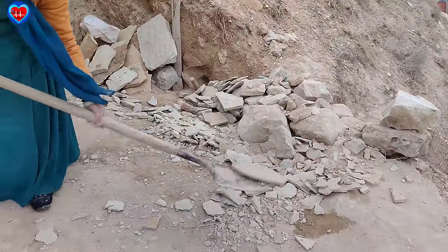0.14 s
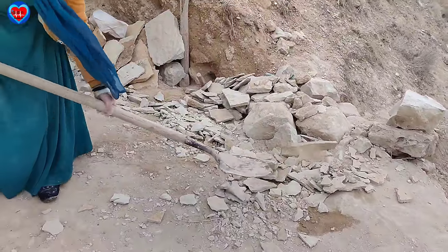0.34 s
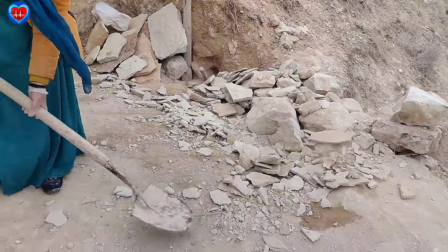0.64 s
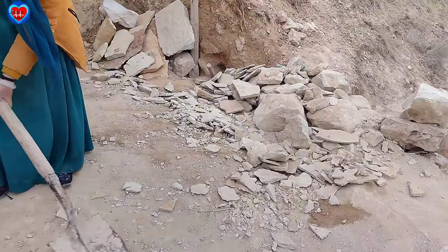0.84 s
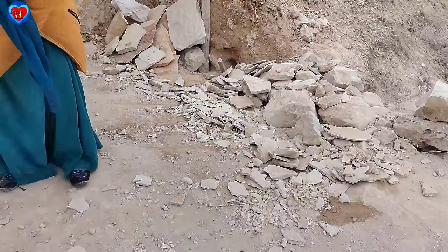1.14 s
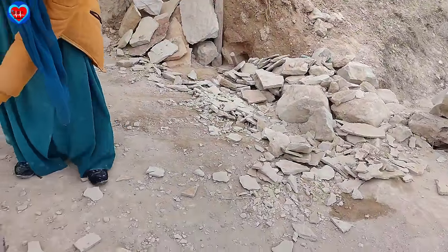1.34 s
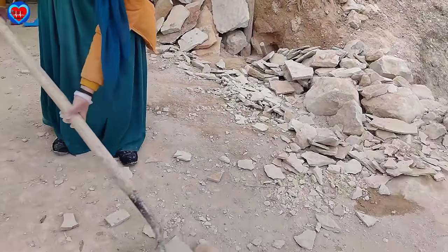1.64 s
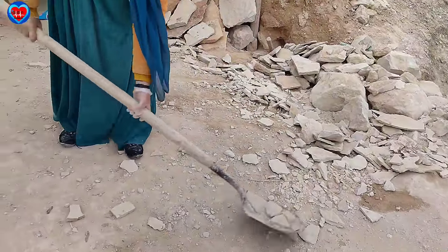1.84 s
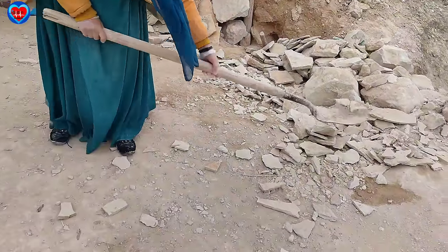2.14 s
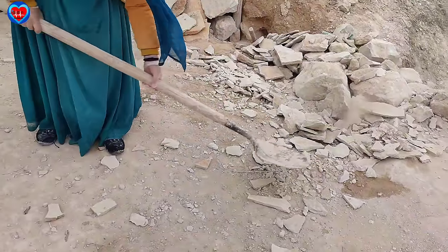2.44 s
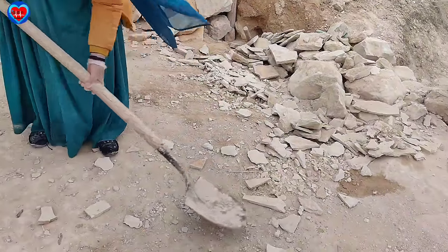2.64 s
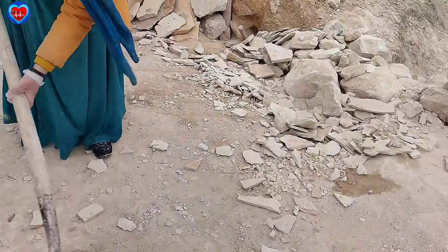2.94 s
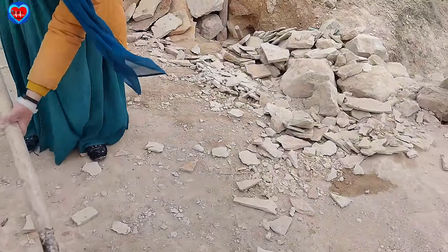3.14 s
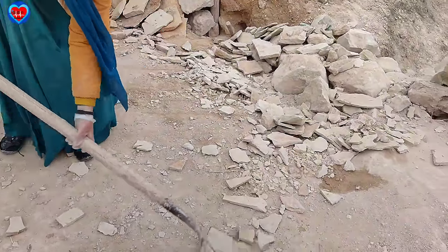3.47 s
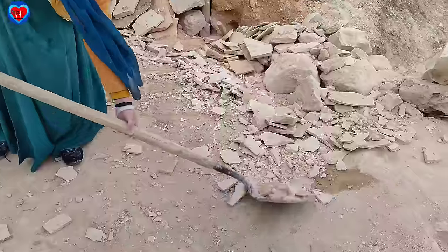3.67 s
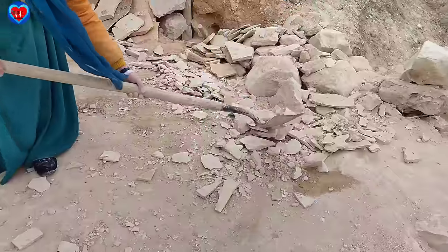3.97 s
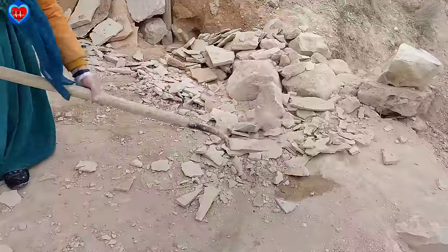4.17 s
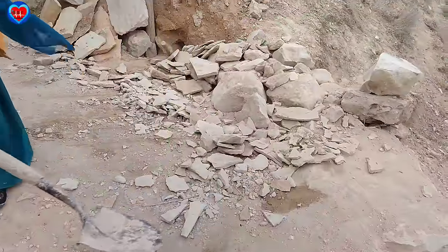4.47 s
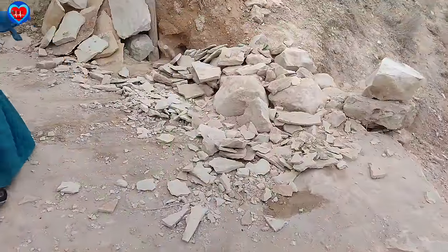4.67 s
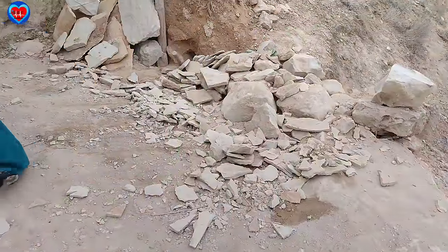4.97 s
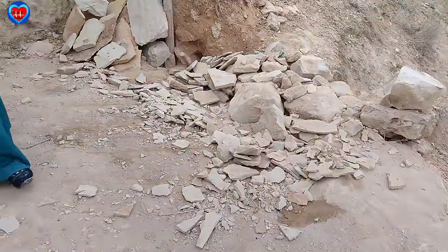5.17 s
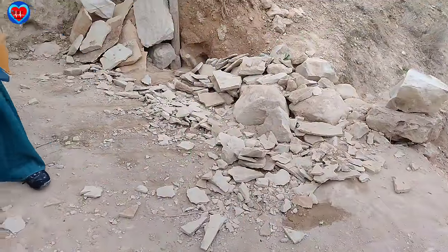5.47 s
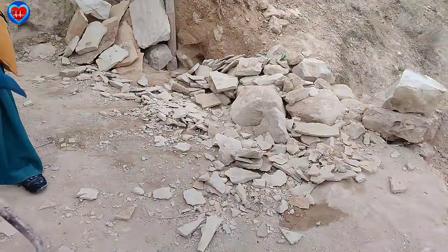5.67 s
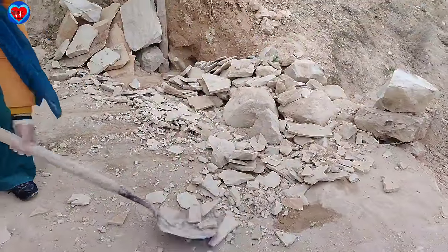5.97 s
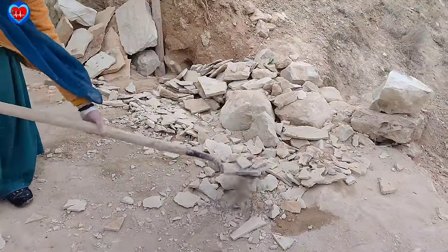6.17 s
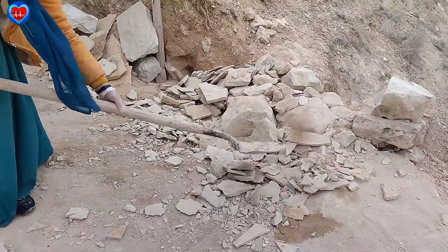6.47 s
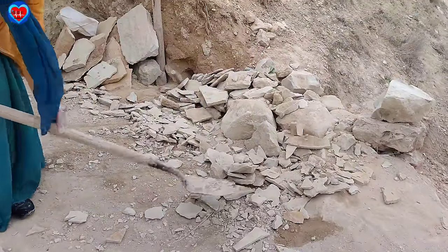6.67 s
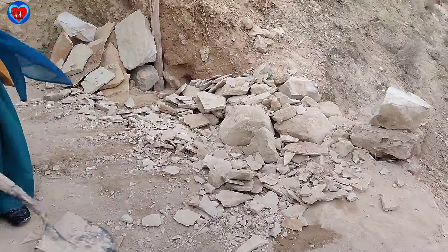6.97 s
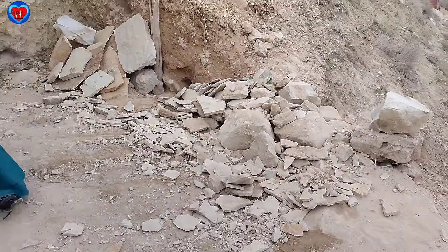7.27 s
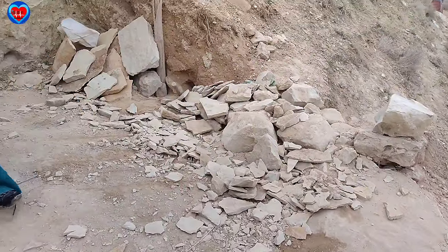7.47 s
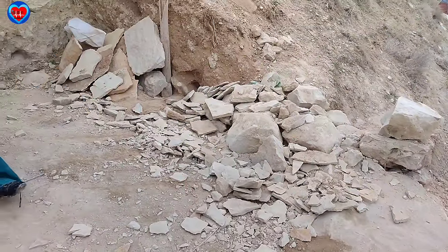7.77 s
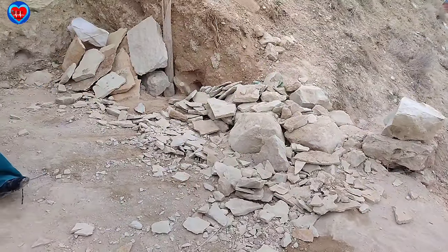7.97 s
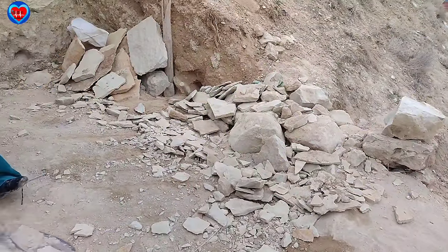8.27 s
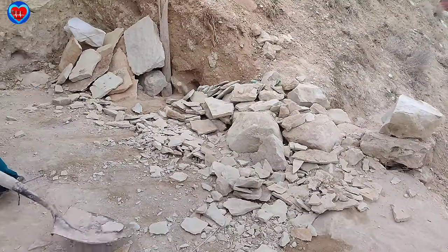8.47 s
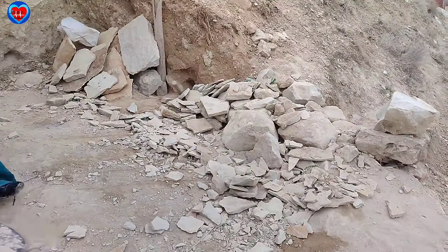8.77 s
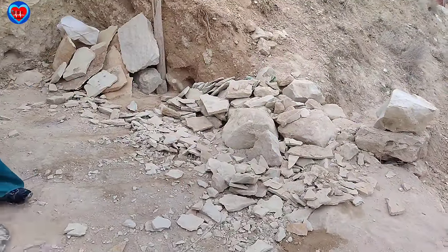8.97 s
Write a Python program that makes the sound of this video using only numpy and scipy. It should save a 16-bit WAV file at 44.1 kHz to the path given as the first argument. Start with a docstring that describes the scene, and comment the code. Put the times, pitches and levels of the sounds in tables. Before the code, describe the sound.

Shovel blade grating and ringing on gravel, then stone chips and slabs clinking down on a rock pile, with low wind rumble.

```python
"""A steel shovel scrapes over stony ground, scoops broken slate and tosses it on a heap, again and again.
Friction is modelled as dense random fractures of grit, which also set the blade's modes ringing.
Hits are noise bursts for the contact plus decaying modes of the blade, slabs, pebbles and chips.
Loose grit trickles as coloured grains and short ticks over faint hiss; rocks scatter sound in random tails.
Wind is low-passed turbulence at each of two microphone ports, strongest at the left one."""
import sys
import numpy as np
from scipy import signal
from scipy.fft import rfft, irfft, next_fast_len
from scipy.io import wavfile
from scipy.ndimage import map_coordinates

SR = 44100
rng = np.random.default_rng(int(sys.argv[2]) if len(sys.argv) > 2 else 0)


def inscribe(sig):
    """Save sig as 16-bit PCM at rate SR to the path in sys.argv[1].

    A 1-D sig is mono; a 2-D sig holds one channel per row.
    Samples are clipped to [-1, 1] before scaling.
    """
    pcm = np.round(np.clip(np.atleast_2d(sig).T, -1, 1) * 32767)
    wavfile.write(sys.argv[1], SR, pcm.astype(np.int16))


N = 401751  # samples in the scene
CLOCK = np.arange(N) / SR  # s, the whole scene
T = np.arange(SR // 2) / SR  # s, the longest single hit
TOP_HZ = 16000  # nothing sounds above this

# Strength of the wind on the ports. Each row: time in seconds, level in dB.
WIND_STRENGTH = [(0.0, -33.5), (0.05, -44), (0.12, -26), (1.22, -25.5), (1.37, -42), (1.6, -22.5),
                 (2.13, -47.5), (2.18, -38.5), (2.54, -42.5), (2.59, -31), (2.69, -49.5), (3.22, -37.5),
                 (3.3, -24), (3.37, -39.5), (3.45, -22.5), (5.3, -39), (5.91, -28.5), (5.94, -31),
                 (7.51, -37), (7.86, -27.5), (8.02, -32), (8.27, -19.5), (8.73, -31), (9.11, -21.5)]
# Short gusts hitting the ports. Each row: start in seconds, length in seconds, rumble in dB, flutter in dB.
GUSTS = [(0.134, 0.03, -29, -27), (0.833, 0.12, -22.5, -32.5), (1.146, 0.062, -25, -29.5),
         (2.563, 0.063, -39, -40.5), (3.284, 0.036, -27.5, -42), (4.315, 0.038, -27, -43),
         (4.78, 0.17, -33.5, -44.5), (5.316, 0.08, -36.5, -37.5), (5.837, 0.079, -28, -33.5),
         (7.699, 0.18, -29, -39)]
# Single eddies popping on the left port. Each row: time in seconds, relative peak in dB.
EDDY_POPS = [(0.162, -13.5), (0.474, -17), (0.856, -11), (0.959, -18), (1.139, -21.5), (1.194, -3.5),
             (2.584, -22)]
# Spectrum of slow turbulence. Each row: frequency in Hz, level in dB.
RUMBLE_SPECTRUM = [(10, -6), (25, 5), (45, 4), (80, -0.5), (130, -8), (200, -21), (400, -77.5)]
# Spectrum of fast turbulence. Each row: frequency in Hz, level in dB.
FLUTTER_SPECTRUM = [(60, -13.5), (140, 6.5), (220, 1), (330, -19), (500, -35), (1000, -46), (3000, -58.5)]
# Spectrum of the faint open air. Each row: frequency in Hz, level in dB.
AIR_SPECTRUM = [(30, -6), (200, -7.5), (500, -18.5), (1200, -28), (5000, -33.5), (9000, -38), (16000, -30)]
# Loose grit spilling and sliding. Each row: start in seconds, length in seconds, level in dB.
SPILLS = [(1.28, 0.071, -52), (2.54, 0.2, -45.5), (2.96, 0.09, -49), (3.92, 0.51, -44), (6.2, 0.19, -43.5),
          (6.8, 0.16, -51.5)]
# Spectrum of sliding dust. Each row: frequency in Hz, level in dB.
DUST_SPECTRUM = [(150, 0.5), (400, 2), (1000, -1), (2500, 1), (5000, -3), (7000, -7), (9000, -22),
                 (12500, -10.5), (16000, -16.5)]
# Small stones clinking. Each row: time in seconds, level in dB, knock in dB, ring in dB, lowest mode in Hz.
CHIPS = [(0.012, -44, -15.5, 10.5, 3600), (0.112, -44.5, -15, 9.5, 3630), (0.5194, -20.5, -23, -16, 1700),
         (0.5735, -23.5, -15, 14, 3450), (0.5849, -22.5, -3, 8, 1700), (0.6599, -32, -12, -3, 5470),
         (0.7015, -24, -20, 1.5, 5880), (1.8712, -15.5, -1.5, 12.5, 3370), (1.8834, -16.5, -14, 9.5, 3530),
         (1.933, -22, -12.5, 8.5, 3540), (1.9474, -25, -29, 11.5, 3620), (2.4351, -27.5, 9, -15, 1580),
         (2.4568, -19, -18, 0.5, 2410), (2.4704, -21.5, -7, 1, 3350), (2.4824, -16.5, -22, 0.5, 3760),
         (2.4995, -14.5, -2, 6.5, 2400), (2.5294, -18.5, -11, 1, 2390), (2.6005, -29.5, -11, 5.5, 6660),
         (2.6135, -23, -8, -8, 6700), (3.9, -22, -9, -5, 2240), (4.0214, -17.5, -11.5, 4, 2170),
         (4.0355, -15, -28, 4.5, 1750), (4.1064, -24, -22, -9, 1810), (4.1597, -23.5, -3.5, -14, 1780),
         (4.1949, -17.5, -10, -11.5, 2240), (4.2617, -8, -15.5, -22, 4100),
         (4.2757, -14.5, -36.5, -13, 3830), (4.2886, -11, -24, -4.5, 5640), (4.2944, -10.5, -23, -15, 2680),
         (4.3665, -20.5, -2, -1.5, 3020), (4.4538, -35.5, 2.5, 2.5, 2180), (6.3095, -21, -37, -22, 4350),
         (6.4747, -19.5, -32, -2.5, 3720), (6.528, -31, -36.5, 4.5, 5430), (6.5823, -28.5, -13.5, -3, 5450),
         (6.6423, -13.5, -9.5, -3.5, 1615), (6.6756, -23, -25, 8, 2430), (7.028, -32, -6, -8, 1440),
         (7.0436, -27, -1.5, -1, 1685), (8.7531, -23.5, -20, -6, 4980)]
# Slabs landing and bouncing, and two faint low pebble knocks (near 4.4 and 4.5 s). Each row: time in seconds,
# level in dB, knock in dB, ring in dB, lowest mode in Hz.
SLABS_AND_PEBBLES = [(0.5288, -5.5, -5, -4, 940), (0.5728, -16.5, 6, 13, 941), (0.7004, -17, -8, 10, 930),
                     (0.7121, -27.5, 4, 11, 930), (0.7672, -30.5, -14, 10, 883), (0.7822, -28, 10, 10, 943),
                     (4.4253, -43.5, 8, 9.5, 790), (4.511, -41.5, 6, 2, 820),
                     (6.4366, -13.5, -11, -8.5, 926), (6.457, -24, -9, 0.5, 990),
                     (6.6822, -12, -10, -5.5, 955.5)]
# Modes of a stone plate. Each row: multiple of its lowest mode, level in dB, t60 in seconds before scaling.
STONE_MODES = [(0.999, 7, 0.099), (1.075, -9, .07), (1.6, -20, .04), (1.93, -1.5, 0.11), (2.55, -19, 0.13),
               (3.3, -20.5, .05), (3.631, -12.5, 0.07), (5.68, -24.5, 0.055), (6.15, -20, .07)]
# Strokes of the blade over the ground. Each row: start, hardest push and end in seconds,
# rasp in dB, digging in dB.
STROKES = [(0.169, 0.219, 0.26, -27.5, -29.5), (1.367, 1.387, 1.494, -29, -42.5),
           (1.455, 1.623, 1.955, -22.5, -26.5), (2.008, 2.193, 2.23, -39, -44),
           (3.283, 3.58, 3.86, -24, -29.5), (3.94, 3.98, 4.34, -38.5, -42),
           (5.149, 5.194, 5.26, -28.5, -42.5), (5.331, 5.398, 5.71, -24, -36),
           (5.719, 5.945, 6.15, -25, -34.5), (7.469, 7.502, 7.535, -33, -46),
           (7.862, 7.986, 8.15, -41.5, -49), (8.147, 8.181, 8.6, -35.5, -41)]
# The blade catching on embedded stones and tearing free. Each row: time in seconds, rasp in dB, digging in dB.
CATCHES = [(1.476, -17, -26), (1.587, -17.5, -42), (1.65, -20.5, -23.5), (1.716, -23, -22.5),
           (3.284, -19, -29), (3.452, -16, -23), (3.578, -30, -27.5), (3.635, -20, -27),
           (3.683, -18.5, -20), (3.754, -28, -31.5), (5.275, -28, -44), (5.368, -25, -42), (5.5, -31, -41),
           (5.641, -23.5, -56), (5.956, -17.5, -22), (6.062, -27, -28), (6.13, -30, -30.5),
           (8.21, -33, -60), (8.534, -36.5, -53.5), (8.6, -53, -37.5)]
# Spectrum of the rasp. Each row: frequency in Hz, level in dB.
RASP_SPECTRUM = [(300, -22), (900, -20.5), (1600, -8), (2400, 0.5), (3800, -2), (5200, -6), (7000, -11),
                 (9000, -20.5), (12500, -14.5), (16000, -23.5)]
# Spectrum of the digging. Each row: frequency in Hz, level in dB.
DIG_SPECTRUM = [(100, -4.5), (250, -2), (450, -6), (750, 2), (1350, 1), (2000, -1), (4000, -37)]
# The blade striking stones or ringing as it lifts off the ground. Each row: time in seconds, level in dB,
# knock in dB, ring in dB, favoured pitch in Hz.
BLOWS_AND_LIFTS = [(0.188, -13.5, -11, -0.5, 1930), (0.2748, -20, -7, 2.5, 2290),
                   (1.4645, -4.5, -19.5, -4.5, 2110), (1.6463, -7, 0.5, 3.5, 1590),
                   (2.1545, -23.5, -5, -0.5, 2270), (2.2134, -23.5, -23, -1, 1600),
                   (3.2734, -11.5, -12, -13.5, 2890), (3.3301, -4.5, -2.5, -2, 2300),
                   (3.5219, -4, -9.5, -5, 2800), (3.5683, -4.5, -5.5, -4.5, 2490),
                   (3.6394, -17.5, 4.5, 7, 2630), (3.6764, -21.5, -10.5, 14.5, 2290),
                   (3.691, -20, -4, 0, 2240), (3.9898, -18.5, -6, 4.5, 2470),
                   (4.0613, -15, -23.5, -4.5, 1830), (5.1436, -30.5, -34, 2.5, 2300),
                   (5.2175, -17.5, -16, -8.5, 2290), (5.7513, -9.5, -23.5, -7, 3530),
                   (5.8217, -6.5, -42.5, -8.5, 4100), (5.9464, -1, -25, -16, 3610),
                   (5.9802, -11.5, -1, -24.5, 1860), (6.2681, -17, -44.5, -14.5, 3250),
                   (7.3955, -18.5, -4, -2, 2470), (7.413, -26.5, -13.5, 0.5, 1880),
                   (7.5276, -29.5, -18, -1, 2300), (8.3858, -18, -0.5, 7, 2900), (8.6001, -34, -6, 9, 1575),
                   (8.738, -18.5, -8, -14, 2520), (8.9364, -20, -27, -0.5, 2110),
                   (8.9434, -11.5, -10, -2, 2120)]
# Modes of the free steel blade. Each row: frequency in Hz, level in dB, t60 in seconds.
BLADE_MODES = [(638.4, -21.5, 0.65), (996, -21, 0.23), (1336, -10.5, 0.067), (1574, -16, 0.45),
               (1670, -22.5, 0.37), (1844, -6, 0.25), (1937, -13, 0.5), (2050, -3.5, 0.11),
               (2125, -13, 0.2), (2184, -12, 0.32), (2277, 0.5, .11), (2452, -7, .09), (2550, -8.5, 0.13),
               (2890, -9, 0.11), (3430, -13.5, 0.16), (3590, -3.5, 0.12), (3660, -10.5, 0.12),
               (4050, -16, .11), (4160, -19.5, 0.11), (4770, -18, 0.12), (5300, -15, 0.075),
               (6720, -17.5, 0.089)]
# Where the blade is. Each row: time in seconds, lead of the left port in ms, left-right difference in dB.
BEARING = [(.2, 0.14, -0.5), (1.6, 0.17, 1.5), (2.3, 0.37, 5), (3.3, 0.16, -1), (3.7, 0.024, 2.5),
           (4.2, 0.53, 1.5), (5.4, .38, -3), (6, 0.11, 4.5), (7.4, 0.38, -4.5), (9, 0.44, -3)]
# Sound arriving scattered off ground and rocks. Each row: frequency in Hz, share of the power.
SCATTERED_SHARE = [(500, 0.072), (1000, 0.41), (2300, 0.64), (5000, 0.85), (12000, 0.81)]
# Difference in colour of the two ports. Each row: frequency in Hz, left-right difference in dB.
PORT_COLOUR = [(400, -3.5), (1000, 4), (1600, 0.5), (2300, -5), (3100, -4.5), (4500, -10.5), (6200, -9),
               (7500, 3.5), (8600, 5.5), (10000, -5), (13000, -5.5)]

GUST_ATTACK_S, GUST_RELEASE_S = 0.019, 0.018
FLUTTER_DB, FLUTTER_GROWS = -47, 1.2  # flutter at the mean strength; it grows faster than the rumble
SPILL_ATTACK_S, SPILL_SETTLE_S = 0.07, 0.12
HISS_DB = -59.5  # a faint steady bed of fine hiss under the spills
GLANCE = 0.32  # dB of crispness gained for each dB of knock lost, as an edge glances off
ENTRY_DB, EXIT_DB = -9.5, -12  # pressure as a stroke begins and ends, against its hardest push
DIG_GROWS = 1.25  # the low grinding grows faster with pressure than the rasp
SINGING_GROWS, FIRM_DB = 0.82, -24  # the steel sings more freely when pressed less than firmly
STROKE_ATTACK_S, STROKE_RELEASE_S = 0.0072, 0.014
CATCH_ATTACK_S, CATCH_HOLD_S, CATCH_RELEASE_S = 0.0075, 0.0088, 0.016
JUDDER_DB, JUDDER_RATE = 1.25, 90  # uneven running of the blade: dB, random knots a second


def amp(db):
    """Level: decibels to amplitude gain."""
    return np.exp(np.asarray(db) * (np.log(10) / 20))


def unit(x):
    """Normalization: scale to rms 1."""
    return x / np.sqrt(np.mean(x ** 2) + 1e-20)


def struck(x):
    """Normalization of a hit: its first 5 ms get rms 1."""
    return x / np.sqrt(np.mean(x[:SR // 200] ** 2) + 1e-20)


def along(points, hz):
    """Interpolation of (Hz, value) points on a logarithmic frequency axis."""
    f, v = np.transpose(points)
    return np.interp(np.log(hz + 1), np.log(f + 1), v)


def curves(rows):
    """Linear interpolation in time: one value per sample for each column after the time."""
    s, *cols = np.transpose(rows)
    return [np.interp(CLOCK, s, c) for c in cols]


def wobble(rate):
    """Slow random fluctuation: a spline through normal draws, rate knots a second."""
    knots = rng.standard_normal(int(N * rate / SR) + 4)
    return map_coordinates(knots, [np.arange(N) * rate / SR])


def filtered(x, response):
    """Linear filtering: the spectrum of x times a response of frequency."""
    m = next_fast_len(N + SR // 4)
    return irfft(rfft(x, m) * response(np.fft.rfftfreq(m, 1 / SR)), m)[..., :N]


def coloured(x, spectrum, size=4096):
    """Minimum-phase filtering: folding the cepstrum makes the filter causal; the result has rms 1."""
    log_gain = np.log(amp(along(spectrum, np.fft.rfftfreq(size, 1 / SR))))
    cepstrum = irfft(log_gain)
    cepstrum[1:size // 2] *= 2
    cepstrum[size // 2 + 1:] = 0
    impulse_response = irfft(np.exp(rfft(cepstrum)))
    return unit(signal.oaconvolve(x, impulse_response)[:N])


def add(track, s, x):
    """Superposition: mix x into the track at time s."""
    part = track[max(0, round(s * SR)):][:len(x)]
    part += x[:len(part)]


def envelope(start, length, attack_s, release_s):
    """Exponential growth to 1 at the start, a hold for the length, then exponential decay."""
    before = np.maximum(start - CLOCK, 0)
    after = np.maximum(CLOCK - start - length, 0)
    return np.exp(-before / attack_s - after / release_s)


def joined(gains):
    """Incoherent addition: independent sounds add in power."""
    return np.sqrt(sum(gain ** 2 for gain in gains))


def gusting():
    """Wind load: the gains of rumble and flutter follow the wind's strength and leap in a gust."""
    strength_db, = curves(WIND_STRENGTH)
    rumble = [amp(strength_db)]
    flutter = [amp(FLUTTER_DB + FLUTTER_GROWS * (strength_db - strength_db.mean()))]
    for start, length, rumble_db, flutter_db in GUSTS:
        gust = envelope(start, length, GUST_ATTACK_S, GUST_RELEASE_S)
        rumble.append(amp(rumble_db) * gust)
        flutter.append(amp(flutter_db) * gust)
    return joined(rumble), joined(flutter)


def wind():
    """Turbulence: independent pressure noise at each port, strongest at the windward left; eddies pop there."""
    rumbling, fluttering = gusting()
    ports = []
    for slow_db, fast_db in [(6.5, 8.0), (-8.5, -10)]:  # left, right
        swirl = unit(amp(3.23 * wobble(22)) * coloured(rng.standard_normal(N), RUMBLE_SPECTRUM))
        # the fast flutter comes in bursts, where the slow swirl swings furthest
        flutter = unit(np.abs(swirl) ** 1.35 * coloured(rng.standard_normal(N), FLUTTER_SPECTRUM))
        ports.append(rumbling * amp(slow_db) * swirl + fluttering * amp(fast_db) * flutter)
    u = (T[:SR // 40] - .01) / .0012  # time from the pop's peak, in units of 1.2 ms
    pop = (1 + u ** 2) ** -1.5
    for s, db in EDDY_POPS:
        add(ports[0], s - .01, amp(db + 9) * pop)
    return np.array(ports)


def open_air():
    """Diffuse background: faint steady coloured noise, independent at each port."""
    return amp(-60.0) * np.array([coloured(rng.standard_normal(N), AIR_SPECTRUM) for port in range(2)])


def grains(rate, spread_db, clump_db):
    """Granular noise: tiny fractures at random moments, few large and many small, coming in clumps."""
    sizes = amp(spread_db * np.minimum(rng.exponential(size=N), 4)) * rng.choice([-1, 1], N)
    breaks = rng.random(N) < rate / SR
    return unit(breaks * sizes * amp(clump_db * wobble(170)))


def pebbles(rate, hz, cycles, spread_db, size=500):
    """Small-body resonance: bits of gravel tick together, each a brief damped sine at its own pitch."""
    draws = rng.random((int(rate * N / SR), 4))
    when, pitch, force, life = draws.T[:, :, None]
    turns = np.minimum(hz * 2 ** (2.4 * (pitch - .5)), TOP_HZ) * T[:size]
    strength = amp(spread_db * np.minimum(-np.log(1 - force), 3.5))
    ticks = strength * np.sin(2 * np.pi * turns) * np.exp(-turns / (cycles * (.5 + life)))
    places = (when * N).astype(int) + np.arange(size)
    return unit(np.bincount(places.ravel(), ticks.ravel(), N)[:N])


def trickling():
    """Granular flow: dust and fine gravel slide off the blade and down the heap, over a faint bed of hiss."""
    spills = [amp(db) * envelope(start, length, SPILL_ATTACK_S, SPILL_SETTLE_S)
              for start, length, db in SPILLS]
    flow = joined([amp(HISS_DB), *spills])
    dust = coloured(grains(rate=7600, spread_db=0.0, clump_db=2.0), DUST_SPECTRUM)
    gravel = pebbles(rate=390, hz=3070, cycles=6.9, spread_db=4.5)
    return flow * (amp(-2.5) * dust + amp(-16.0) * gravel)


def ring(modes, scatter_db, size):
    """Modal synthesis: a sum of decaying sines, excited at new strengths at every contact point."""
    hz, db, t60 = np.transpose(modes)[:, :, None]
    level = db + scatter_db * rng.standard_normal(hz.shape)
    sign = rng.choice([-1, 1], hz.shape) * (hz < TOP_HZ)
    decay = amp(level - 60 * T[:size] / t60)
    return struck(np.sum(sign * decay * np.sin(2 * np.pi * hz * T[:size]), axis=0))


def clinks(rows, life, dull_db):
    """Plate vibration: struck stones ring; life scales t60, dull_db is the higher modes' fall per octave."""
    out = np.zeros(N)
    for s, db, knock_db, ring_db, hz in rows:
        modes = [(hz * k, level - dull_db * np.log2(k), t60 * life) for k, level, t60 in STONE_MODES]
        add(out, s, amp(db + ring_db - 13.0) * ring(modes, scatter_db=6.0, size=SR // 5))
    return out


def crunch(knock_db, crisp_db, t60, size=5000):
    """Brittle fracture: a sharp crack and slower crumbling, as decaying noise in three bands."""
    crumbling = amp(-60 * T[:size] / t60)
    crack = amp(9 - 60 * T[:size] / 0.017)
    out = 0
    for lo, hi, db in [(556, 1770, knock_db), (1580, 4980, -1.7), (5700, 16300, crisp_db + 9.0)]:
        band = signal.butter(2, [lo, hi], "band", fs=SR)
        noise = (crumbling + crack) * rng.standard_normal(size)
        out = out + amp(db) * struck(signal.lfilter(*band, noise))
    return out


def crunches(rows, t60, crisp_db, glance):
    """Contact noise of every row in a table; a glancing contact has less knock and more crispness."""
    out = np.zeros(N)
    for s, db, knock_db, *ringing in rows:
        add(out, s, amp(db - 10.0) * crunch(knock_db, crisp_db - glance * knock_db, t60))
    return out


def effort():
    """Friction force: gains of rasp and digging; strokes press harder, then ease; each catch adds a surge."""
    judder_db = JUDDER_DB * wobble(JUDDER_RATE)
    rasp, dig = [], []
    for start, hardest, end, rasp_db, dig_db in STROKES:
        contact = envelope(start, end - start, STROKE_ATTACK_S, STROKE_RELEASE_S)
        push_db = np.interp(CLOCK, [start, hardest, end], [ENTRY_DB, 0, EXIT_DB])
        pressure_db = push_db + judder_db
        rasp.append(contact * amp(rasp_db + pressure_db))
        dig.append(contact * amp(dig_db + DIG_GROWS * pressure_db))
    for s, rasp_db, dig_db in CATCHES:
        surge = envelope(s, CATCH_HOLD_S, CATCH_ATTACK_S, CATCH_RELEASE_S)
        rasp.append(amp(rasp_db) * surge)
        dig.append(amp(dig_db) * surge)
    return joined(rasp), joined(dig)


def scraping():
    """Friction excitation: grit breaks under the blade and rings the steel; digging adds a coarse, low grinding."""
    rasping, digging = effort()
    fine = grains(rate=5500, spread_db=3.5, clump_db=2.0)
    coarse = grains(rate=880, spread_db=5.5, clump_db=4.5)
    snaps = grains(rate=180, spread_db=9.0, clump_db=0.0)
    rasp = rasping * amp(-3.0) * coloured(fine + .5 * coarse + 0.41 * snaps, RASP_SPECTRUM)
    gravel = rasping * amp(-11.5) * pebbles(rate=800, hz=3263, cycles=7.0, spread_db=1.0)
    dig = digging * amp(-1.5) * coloured(grains(rate=1800, spread_db=4.5, clump_db=3), DIG_SPECTRUM)
    # pressed against the ground, the plate is partly damped
    damped = [(hz, db, .6 * t60) for hz, db, t60 in BLADE_MODES]
    steel = ring(damped, scatter_db=0, size=SR // 2)
    drive = amp(FIRM_DB - 6) * (rasping / amp(FIRM_DB)) ** SINGING_GROWS * fine
    singing = signal.oaconvolve(drive, steel / np.linalg.norm(steel))[:N]
    return rasp + gravel + dig + singing


def clangs(favour_db, octaves):
    """Modal excitation: the blade, struck or lifting off, rings with the modes around one pitch favoured."""
    out = np.zeros(N)
    for s, db, knock_db, ring_db, favoured_hz in BLOWS_AND_LIFTS:
        modes = []
        for hz, level, t60 in BLADE_MODES:
            closeness = np.exp(-(np.log2(hz / favoured_hz) / octaves) ** 2)
            modes.append((hz, level + favour_db * closeness, t60))
        add(out, s, amp(db + ring_db - 10.5) * ring(modes, scatter_db=4.0, size=SR // 2))
    return out


def placed(x, lead_ms, pan_db):
    """Time and level differences: the left port hears the source a little earlier, and the levels differ."""
    shift = lead_ms * SR / 1000  # samples
    late = map_coordinates(x, [np.arange(N) - shift], order=3)
    return np.array([amp(pan_db / 2) * x, amp(-pan_db / 2) * late])


def rocks(x, t60, size):
    """Diffuse scattering: convolution with decaying noise for each port, new for every stretch of size samples."""
    pieces = np.pad(x, (0, -N % size)).reshape(-1, size)
    tails = rng.standard_normal((2, *pieces.shape)) * amp(-60 * T[:size] / t60)
    tails /= np.linalg.norm(tails, axis=2, keepdims=True)
    answers = irfft(rfft(pieces, 2 * size) * rfft(tails, 2 * size))
    # each answer overhangs into the next stretch
    heads = answers[..., :size].reshape(2, -1)
    overhangs = answers[..., size:].reshape(2, -1)
    return (heads + np.pad(overhangs, ((0, 0), (size, 0)))[:, :-size])[:, :N]


def scene():
    """Superposition: shovel and heap among the rocks, in wind and faint open air."""
    bearing = curves(BEARING)
    shovel = scraping() + crunches(BLOWS_AND_LIFTS, t60=0.062, crisp_db=-26, glance=GLANCE)
    large_contacts = crunches(SLABS_AND_PEBBLES, t60=0.11, crisp_db=-26, glance=GLANCE)
    chip_contacts = crunches(CHIPS, t60=0.096, crisp_db=-27, glance=0.05)
    stones = large_contacts + chip_contacts + trickling()

    direct = placed(shovel, *bearing) + stones
    near_rocks = rocks(shovel + stones, t60=0.02, size=1024)
    scattered = near_rocks + amp(-16.0) * rocks(shovel + stones, t60=.25, size=8192)
    share = lambda hz: np.clip(along(SCATTERED_SHARE, hz), 0, 1)
    grit = filtered(direct, lambda hz: np.sqrt(1 - share(hz)))
    grit = grit + filtered(scattered, lambda hz: np.sqrt(share(hz)))

    steel = placed(clangs(favour_db=9, octaves=0.064), *bearing)
    # a negative dull_db strengthens the higher modes
    plates = clinks(SLABS_AND_PEBBLES, life=0.94, dull_db=-3.0) + clinks(CHIPS, life=0.61, dull_db=24.5)
    work = filtered(grit + steel + plates,
                    lambda hz: amp(np.outer([1, -1], along(PORT_COLOUR, hz)) / 2))
    return work + open_air() + wind()


def record(dry):
    """Saturation and band limiting: the highest peaks are rounded off and nothing above TOP_HZ is kept."""
    rounded = dry / (1 + np.abs(dry / .9) ** 6) ** (1 / 6)
    return filtered(rounded, lambda hz: hz < TOP_HZ)


dry = scene()
out = record(dry)
inscribe(out)
```